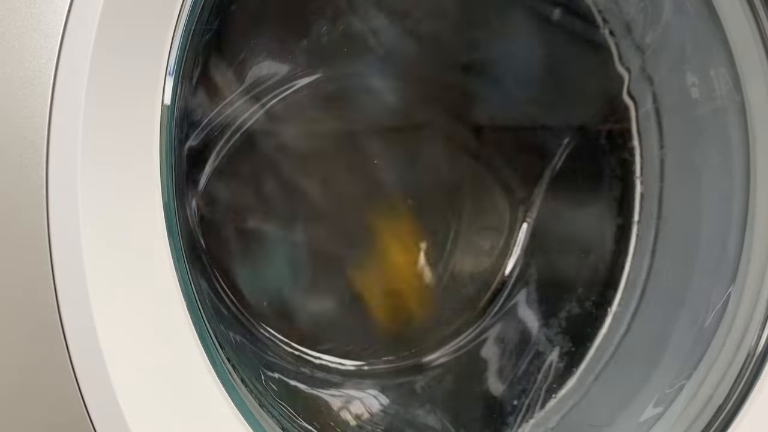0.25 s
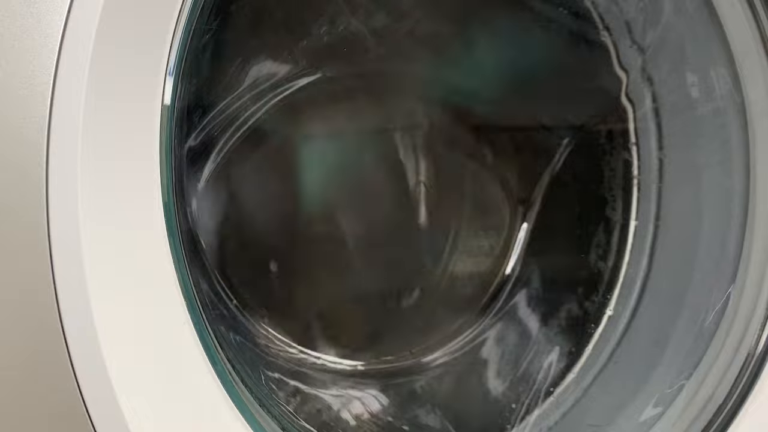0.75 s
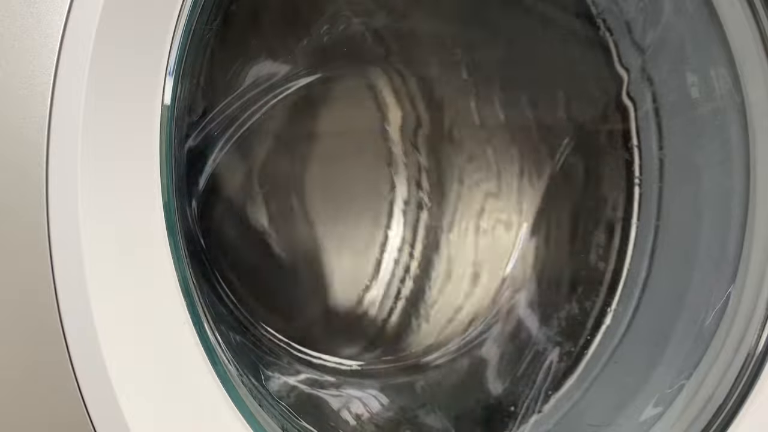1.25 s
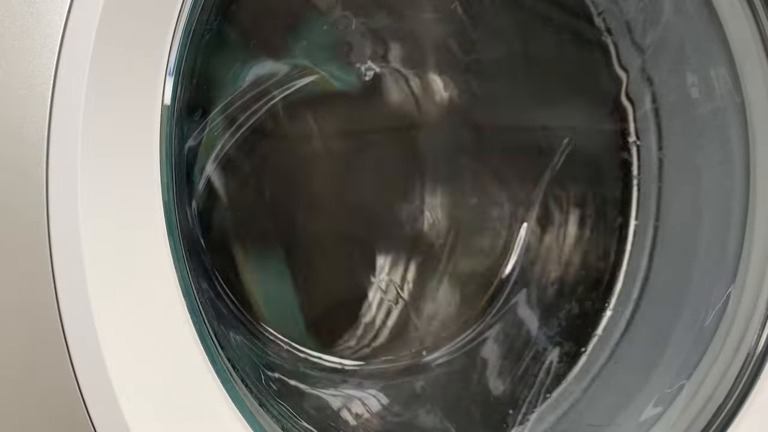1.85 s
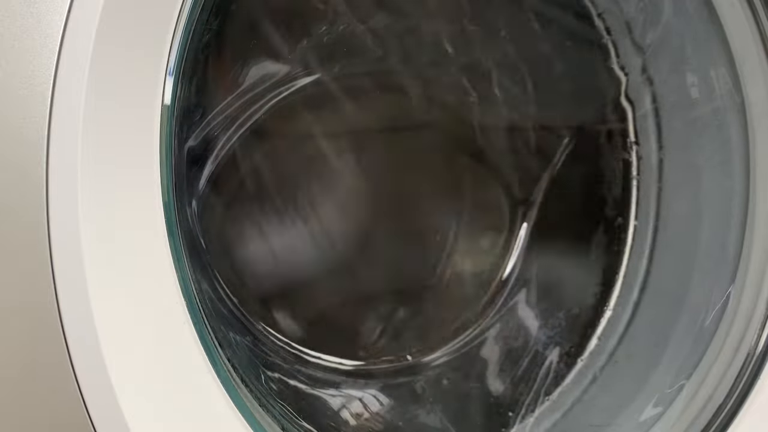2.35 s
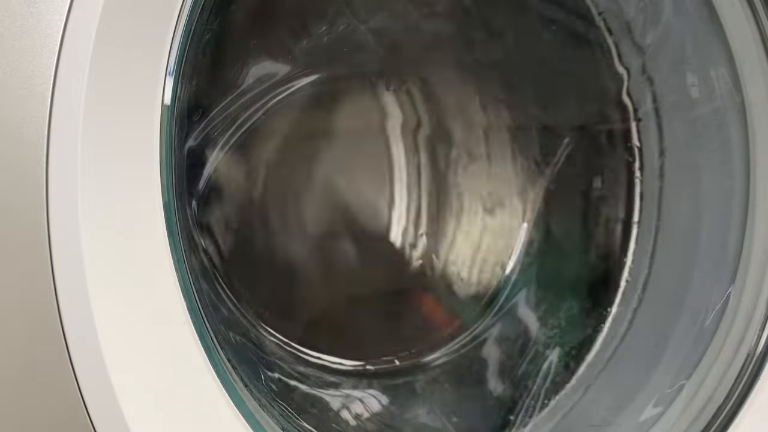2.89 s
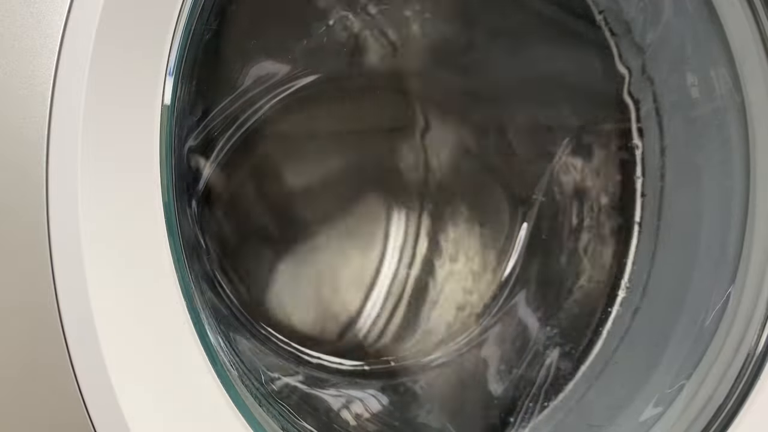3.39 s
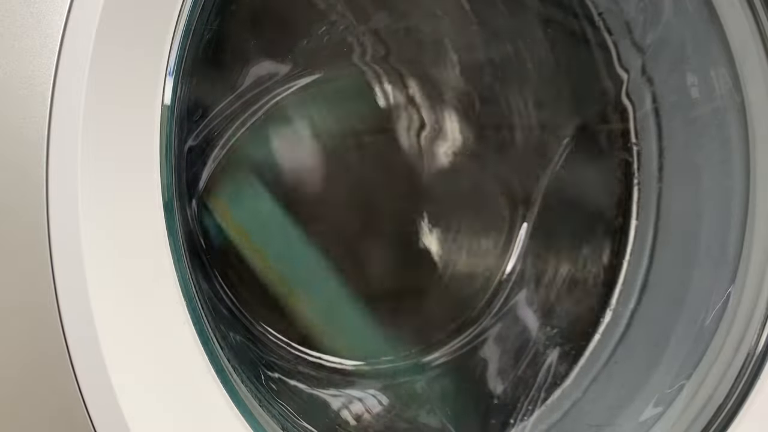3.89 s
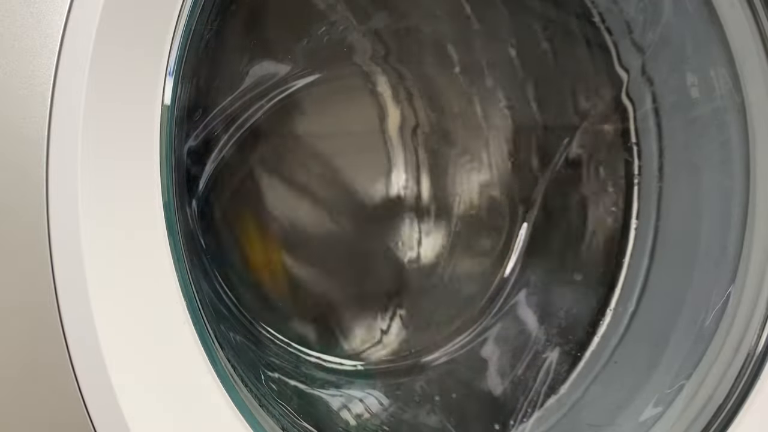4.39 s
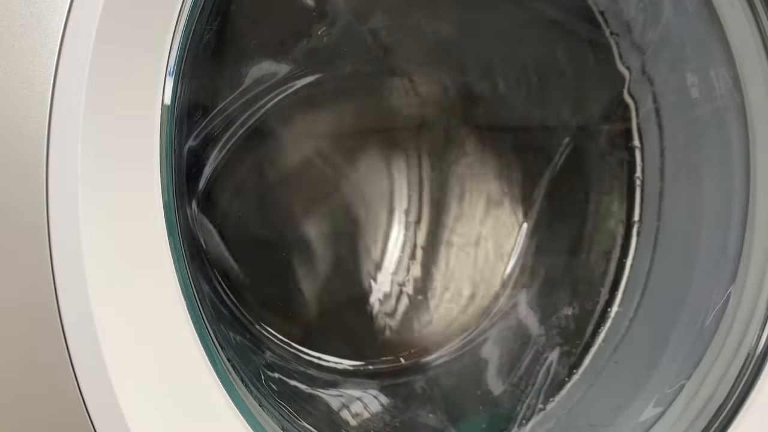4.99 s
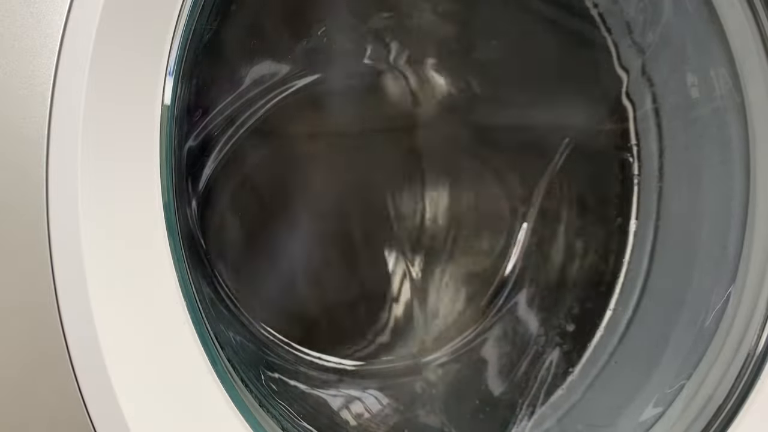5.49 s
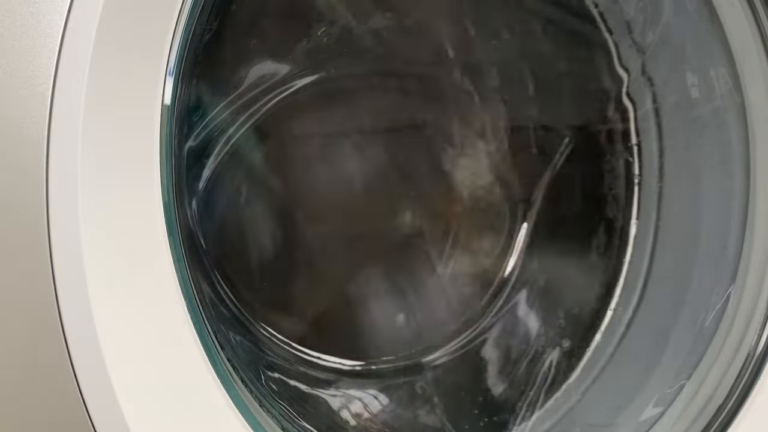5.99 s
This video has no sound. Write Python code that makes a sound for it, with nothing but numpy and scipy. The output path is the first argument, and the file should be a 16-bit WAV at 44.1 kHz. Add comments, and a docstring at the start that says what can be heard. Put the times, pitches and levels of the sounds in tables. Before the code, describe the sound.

For about six seconds a front-loading washing machine tumbles wet laundry, heard close to its door in a small room with a short, soft echo. A faint, wavering low motor hum and dull rumble run throughout. Water sloshes continuously, dark and full, with bubbling gurgles and thin fizzing spray, surging unevenly every 0.4 seconds. A hollow drum bump comes at 0.1, then small gulping slaps around 0.2 to 0.35. Splashy falls land at 1.4 and 1.5, a deep thud at 2.0 and softer knocks at 2.3 and 2.4. Wet smacks follow at 3.2, 3.9 and 4.05, with a plopping slap at 4.3. Falls crowd together from 4.7, peaking in the loudest splash and boom near 5.2, followed by a slap at 5.3. Another booming splash hits at 5.6, and a softer fall around 6.0 as the churning continues.

```python
"""In a small room, close to the door of a front-loading washing machine tumbling wet laundry.
Under it all the motor hums, a wavering sine, and the laundry rumbles as low noise heaved by three paddles.
Water is noise mixed with ringing bubbles, swelling with the paddle beat, small splats and breaking waves.
Folds slap shut with a gulp of trapped air. Falling clothes splash, smack and plop,
boom through the drum's modes and thud in the sprung tub."""
import sys
import numpy as np
from scipy import signal
from scipy.fft import rfft, irfft, next_fast_len
from scipy.io import wavfile
from scipy.ndimage import uniform_filter1d, map_coordinates

SR = 44100
rng = np.random.default_rng(int(sys.argv[2]) if len(sys.argv) > 2 else 0)


def wav_out(sig):
    """Save sig, one row per channel (or a flat mono array), as 16-bit PCM at SR to the path in sys.argv[1]."""
    wavfile.write(sys.argv[1], SR, np.round(np.clip(np.atleast_2d(sig).T, -1, 1) * 32767).astype(np.int16))


N = 275625

# Table levels are relative: each layer adds its own trim.
# motor hum: (f/Hz, level/dB)
MOTOR_HUM = (99.8, -46)
# spectrum of the tumbling laundry's rumble: (f/Hz, level/dB)
RUMBLE_SPECTRUM = [(20, -19), (36, -9), (52, -5.5), (80, 6), (100, -1.5), (130, -7), (300, -73)]
# spectrum of the deep, heaving water: (f/Hz, level/dB)
CHURN_SPECTRUM = [(70, -35), (125, -5.5), (165, 0), (230, 0), (330, -2), (450, -4.5), (1200, -50)]
# spectrum of the body of the water: (f/Hz, level/dB)
SLOSH_SPECTRUM = [(150, -19), (300, -6), (450, 1.5), (650, .3), (1000, -1.8), (1300, -4), (1650, -8),
                  (2100, -15), (3000, -25), (5000, -37), (10000, -70)]
# spectrum of the fizzing spray: (f/Hz, level/dB)
SPRAY_SPECTRUM = [(700, -4), (1700, 7.6), (2700, 2), (4000, -7.3), (5500, -10), (7500, -17.8),
                  (10800, -13.6), (12300, -19.5)]
# modes of the drum's air and shell: (f/Hz, level/dB, t60/s)
DRUM_MODES = [(162, -2.5, .18), (226, 1, .2), (281, -6, .2), (328, -4, .15), (405, -5.5, .12),
              (463, -6.5, .12), (615, -4, .09), (735, -7.3, .08), (962, -4.2, .08)]
# modes of the water-filled tub on its springs: (f/Hz, level/dB, t60/s)
TUB_MODES = [(62, -3, .22), (78, .5, .28), (98, -3, .5)]
# lift of the slosh by each of the three paddles in turn: (level/dB)
PADDLE_LIFTS = [5, 2.5, 4.5]
# waves that break over the laundry: (t/s of the start, slosh level/dB, spray level/dB, swell to the crest/s)
BREAKING_WAVES = [(0.0, -29.5, -46, 0.039), (0.348, -28, -49.5, 0.032), (0.488, -32.5, -46.5, 0.028),
                  (0.822, -25.5, -47, 0.024), (0.923, -32, -52.5, 0.018), (1.007, -29, -56, 0.02),
                  (1.085, -34.5, -63, 0.041), (1.21, -31.5, -55, 0.015), (1.618, -35, -44.5, 0.012),
                  (1.787, -41, -49.5, 0.02), (1.87, -33, -45.5, 0.026), (1.951, -27, -45.5, 0.045),
                  (2.267, -31.5, -46, 0.037), (2.358, -28, -47, 0.037), (2.669, -39, -47, 0.0081),
                  (2.815, -30.5, -62, 0.019), (2.988, -38, -55, 0.021), (3.228, -27, -47, 0.046),
                  (3.578, -32.5, -46.5, 0.016), (3.65, -28.5, -45, 0.022), (3.977, -31, -47, 0.023),
                  (4.219, -30, -46.5, 0.023), (4.262, -30, -48.5, 0.038), (4.432, -31.5, -49, 0.046),
                  (4.503, -31, -47, 0.022), (4.77, -30.5, -49.5, 0.058), (5.29, -31.5, -52, 0.028),
                  (5.626, -31.5, -62, 0.038), (5.714, -33, -55, 0.039), (5.85, -26.5, -46.5, 0.028),
                  (6.07, -30, -49, 0.033)]
# wet folds that slap shut on a pocket of air: (t/s, level/dB, pitch f/Hz)
FOLD_SLAPS = [(0.203, -28, 870), (0.283, -24, 700), (0.341, -27.5, 940), (1.02, -27, 580), (2.0, -29, 590),
              (2.703, -24, 940), (4.301, -22.5, 900), (4.44, -28, 1260), (4.864, -26, 740),
              (5.31, -21.5, 622), (5.65, -24.5, 670)]
# laundry falling into the water: (t/s, splash level/dB, boom level/dB, boom centre f/Hz,
# thud level/dB, thud centre f/Hz, spray level/dB, rise/s, splash t60/s)
LAUNDRY_FALLS = [(0.052, -29, -39, 250, -21, 76, -62, 0.003, 0.1),
                 (0.097, -23, -17, 410, -47, 100, -46, 0.0022, 0.35),
                 (0.812, -26.5, -36, 298, -36, 80, -44.5, 0.0055, 0.27),
                 (1.403, -17.5, -29, 290, -32, 97, -40, 0.003, 0.135),
                 (1.521, -14.5, -20.5, 225, -24, 100, -41.5, 0.003, 0.12),
                 (2.017, -27, -22.5, 226, -13, 75, -50, 0.0019, 0.13),
                 (2.29, -29, -19, 226, -21, 64, -41.5, 0.0083, 0.053),
                 (2.427, -23.5, -23.5, 240, -18, 82, -47, 0.0056, 0.48),
                 (3.187, -19, -26, 300, -19, 105, -45.5, 0.0027, 0.21),
                 (3.309, -25, -33, 233, -16, 88, -43, 0.0016, 0.11),
                 (3.876, -23.5, -29.5, 216, -19, 100, -43.5, 0.0058, 0.22),
                 (4.048, -16.5, -24, 260, -20, 92, -45, 0.0028, 0.17),
                 (4.686, -22.5, -22, 239, -42, 100, -45, 0.0054, 0.31),
                 (4.933, -23.5, -19.5, 300, -21, 84, -53, 0.0023, 0.24),
                 (5.033, -20, -20, 326, -36, 76.4, -46, 0.0022, 0.2),
                 (5.174, -13.5, -10.5, 355, -13.5, 104, -42.5, 0.0016, 0.14),
                 (5.196, -24, -14, 240, -13, 98, -52, 0.0016, 0.16),
                 (5.581, -17, -14, 278, -24, 105, -39, 0.0022, 0.25),
                 (6.025, -27.5, -20, 225, -22, 84, -49, 0.0027, 0.58)]
# decay of the room: (f/Hz, t60/s)
ROOM_DECAY = [(100, 0.69), (1000, 0.33), (10000, 0.13)]
# likeness of the two microphone ports: (f/Hz, likeness/0-1)
PORT_LIKENESS = [(100, .99), (260, .85), (450, .5), (1200, .35), (2500, .3), (5000, .55), (8000, .85)]
# phase by which the left port leads: (f/Hz, lead/rad)
LEFT_LEAD = [(100, -0.09), (280, 0.6), (600, 2.12), (1400, 2), (2900, 6.5), (5000, 8), (6800, 6.5),
             (10300, 0.5)]
# left port minus right port: (f/Hz, level/dB)
LEFT_TILT = [(100, 0.5), (190, 1), (350, 2.5), (620, 8.5), (1120, 2.5), (2010, 0), (4000, 7), (6500, 6.5),
             (9000, -1)]

TOP_HZ = 12300
PADDLE_EVERY_S, FIRST_PADDLE_S = .404, .175
# a paddle enters the water, drags it along, lets it run off
SCOOP_S, CARRY_S, DRAIN_S = .135, .17, .09
CALM_SLOSH_DB, CALM_SPRAY_DB = -39, -56  # between paddles, before the layer trims
WAVE_SHARPNESS = 1.2  # the sharper, the more a wave bunches round its crest
# small splats that lap all the time: mean rate, rise, decay, rms depth
LAPS_PER_S, LAP_RISE_S, LAP_T60_S, LAP_DB = 24, .004, .14, 1.1
SPRAY_FOLLOWS = .7  # share of the lapping's dB swing that the spray follows
LEVEL_SHIFT = .02  # share of their pitch by which the water's resonances lean either way
# a pocket sheds bubbles: delay and loss from one to the next, log-pitch scatter round the first
BREAKUP_S, BREAKUP_DB, BREAKUP_SPREAD = .0081, -6.5, .234
SLAP_RISE_S, SLAP_T60_S = .0035, .13
SLAP_SPLASH_DB, SLAP_SPRAY_DB = -5, -21  # against the gulp
PLOP_HZ, PLOP_SPREAD = 965, .04  # a steady ring struck by each fall: usual pitch, log-pitch scatter
# cloth sliding in ahead of its fall: time constant in rise times, level against the spray
SLIDE_RISES, SLIDE_DB = 3, -6.5


def amp(db):
    """Decibels to gain."""
    return 10 ** (np.asarray(db) / 20)


def unit(x):
    """Scale to rms 1."""
    return x / np.sqrt(np.mean(x ** 2) + 1e-20)


def along(points, hz):
    """Read a (f/Hz, value) curve on a log frequency axis."""
    f, v = np.transpose(points)
    return np.interp(np.log(hz + 1), np.log(f + 1), v)


def wobble(rate):
    """A smooth random curve, rate knots a second."""
    knots = rng.standard_normal(int(N * rate / SR) + 4)
    coarse = np.arange(0, N, 32)
    smooth = map_coordinates(knots, [coarse * rate / SR])
    return np.interp(np.arange(N), coarse, smooth)


def filtered(x, response):
    """Apply a complex response of frequency to x."""
    m = next_fast_len(N + SR // 4)
    hz = np.fft.rfftfreq(m, 1 / SR)
    return irfft(rfft(x, m) * response(hz), m)[..., :N]


def add(track, s, sound):
    """Mix a sound into a track at time s."""
    part = track[max(round(s * SR), 0):][:len(sound)]
    part += sound[:len(part)]


def burst(t, rise, t60):
    """A swell and decay with its top at 1."""
    shape = (1 - np.exp(-(t / rise) ** 2)) * amp(-60 * t / t60)
    return shape / shape.max()


def room(x):
    """A short tail of decaying noise: walls scatter the middle and treble, and the treble dies first."""
    hz, t, z = signal.stft(rng.standard_normal((2, SR // 3)), SR, nperseg=256)
    decay = amp(-60 * t / along(ROOM_DECAY, hz)[:, None])
    tail = signal.istft(z * decay, SR, nperseg=256)[1]
    no_bass = signal.butter(3, 500, "high", fs=SR, output="sos")
    tail = signal.sosfilt(no_bass, tail)
    return signal.fftconvolve(x, tail / np.linalg.norm(tail[0]), axes=1)[:, :N]


def paddles():
    """Lift of the water's level in dB: each paddle scoops, carries and drains, then the next follows."""
    passes, age = np.divmod(np.arange(N) / SR - FIRST_PADDLE_S, PADDLE_EVERY_S)
    draining = 1 - (age - SCOOP_S - CARRY_S) / DRAIN_S
    stroke = np.clip(np.minimum(age / SCOOP_S, draining), 0, 1)
    return np.take(PADDLE_LIFTS, passes.astype(int), mode="wrap") * stroke


def drum_peaks(hz, lift_db=9, width=.04):
    """Gain of the drum's resonances for the noise inside it; width is a share of each pitch."""
    return amp(sum((lift_db + db) / (1 + ((hz / f - 1) / width) ** 2) for f, db, _ in DRUM_MODES))


def coloured(x, spectrum):
    """Shape x to a spectrum at rms 1, its drum resonances leaning as the water rises and sinks."""
    def tuned(shift):
        return filtered(x, lambda hz: amp(along(spectrum, hz)) * drum_peaks(hz / (1 + shift)))

    low, high = tuned(-LEVEL_SHIFT), tuned(LEVEL_SHIFT)
    level = (1 + np.tanh(2 * wobble(7))) / 2
    return unit((2.5 - level) * low + level * high)


def motor():
    """A sine hum wavers a little with the load; each paddle heaves the laundry's noise rumble along."""
    hz, db = MOTOR_HUM
    waver_db = 2.2 * np.tanh(wobble(6))
    phase = 2 * np.pi * hz * np.arange(N) / SR + .5 * wobble(6)
    hum = np.sqrt(2) * amp(db + waver_db) * np.sin(phase)
    heave = amp(-41.5 + .5 * paddles())
    rumble = heave * coloured(rng.standard_normal((2, N)), RUMBLE_SPECTRUM)
    return hum, rumble


def bubbles(low_hz, high_hz, cycles, spread_db, count):
    """Two unrelated streams of bubbles, flat in spectrum: short ringing tones that rise in pitch."""
    when, pitch, size, stream = rng.random((count, 4)).T
    hz = low_hz * (high_hz / low_hz) ** pitch
    age = np.arange(int(cycles / low_hz * SR))
    turns = hz[:, None] * age / SR
    life = np.minimum(turns / cycles, 1)
    fade = np.exp(-np.log(100) * life) * (1 - life)
    tone = np.sin(2 * np.pi * turns * (1 + 0.14 * life)) * fade
    gain = hz * amp(-spread_db * np.log(size + 0.017))
    start = (when * N).astype(int) + N * (stream > .5)
    # both streams lie end to end in one track, then split
    pair = np.bincount((start[:, None] + age).ravel(), (gain[:, None] * tone).ravel(), 2 * N)
    return unit(pair[:2 * N].reshape(2, N))


def patchy(x, depth_db):
    """Pockets of air open and close between the clothes, each favouring its own band for a moment."""
    z = signal.stft(x, nperseg=512)[2]
    field = rng.standard_normal(z.shape[1:])
    field = uniform_filter1d(field, size=5, axis=0)  # across frequency
    field = uniform_filter1d(field, size=7, axis=1)  # across time
    return signal.istft(z * amp(depth_db * unit(field)), nperseg=512)[1][:, :N]


def laps(per_s, rise, t60):
    """Level curve of small random splats, each sudden and then running out; mean 0, rms 1."""
    hits = (rng.random(N) < per_s / SR) * rng.uniform(.5, 1, N)
    level = signal.fftconvolve(hits, burst(np.arange(SR // 4) / SR, rise, t60))[:N]
    return unit(level - level.mean())


def wash():
    """Slosh and spray levels in dB: the paddles' uneven beat, with waves that swell and run out on top."""
    stir_db = paddles() + 0.5 * wobble(28)
    slosh = amp(CALM_SLOSH_DB + stir_db) ** 2
    spray = amp(CALM_SPRAY_DB + stir_db) ** 2
    t = np.arange(SR // 2) / SR
    for s, slosh_db, spray_db, swell in BREAKING_WAVES:
        crest = (t / swell * np.exp(1 - t / swell)) ** WAVE_SHARPNESS
        add(slosh, s, (amp(slosh_db) * crest) ** 2)
        add(spray, s, (amp(spray_db) * crest) ** 2)
    return 10 * np.log10(slosh), 10 * np.log10(spray)


def splashes(splash_db, churn_db, spray_db):
    """Power of falls and slaps: cloth slides in, spray and splash burst, the deep churn follows."""
    t = np.arange(SR // 2) / SR
    splash, churn, spray = np.zeros((3, N))
    for s, db, boom_db, _, _, _, fizz_db, rise, t60 in LAUNDRY_FALLS:
        splash_gain, spray_gain = amp(db + splash_db), amp(fizz_db + spray_db)
        # a hard fall, with its short rise, comes with little warning
        slide = amp(SLIDE_DB) * np.exp(-t[::-1] / (SLIDE_RISES * rise))
        lead = slide[max(len(t) - round(s * SR), 0):]
        lead_start = s - len(lead) / SR
        add(spray, lead_start, (spray_gain * lead) ** 2)
        add(splash, lead_start, (splash_gain * lead / 2) ** 2)
        add(spray, s - .001, (spray_gain * burst(t, rise, 0.95 * t60)) ** 2)
        add(splash, s, (splash_gain * burst(t, rise, t60)) ** 2)
        add(churn, s + .005, (amp(boom_db + churn_db) * burst(t, 1.3 * rise, 1.6 * t60)) ** 2)
    for s, db, _ in FOLD_SLAPS:
        slap = amp(db) * burst(t, SLAP_RISE_S, SLAP_T60_S)
        add(splash, s, (amp(SLAP_SPLASH_DB) * slap) ** 2)
        add(spray, s, (amp(SLAP_SPRAY_DB) * slap) ** 2)
    return splash, churn, spray


def water():
    """Noise and bubbles in body, deep and mist layers, stirred all the time and thrown up by each fall."""
    slosh_db, spray_db = wash()
    splash, churn, spray = splashes(splash_db=-3.5, churn_db=-13, spray_db=6.0)
    lapping = LAP_DB * laps(LAPS_PER_S, LAP_RISE_S, LAP_T60_S)

    gurgle = rng.standard_normal((2, N))
    gurgle += 0.29 * bubbles(low_hz=277.7, high_hz=2518, cycles=21.3, spread_db=2.5, count=2600)
    fizz = rng.standard_normal((2, N))
    fizz += 0.34 * bubbles(low_hz=1710, high_hz=10900, cycles=4.2, spread_db=2.5, count=9000)

    # stirring and splashing add as powers
    body_gain = np.sqrt(amp(slosh_db + lapping - 0.2) ** 2 + splash)
    body = body_gain * coloured(patchy(gurgle, depth_db=1.32), SLOSH_SPECTRUM)
    # the deep water heaves with each surge
    deep_gain = np.sqrt(amp(slosh_db + 1.4 * wobble(18) - 3.0) ** 2 + churn)
    deep = deep_gain * coloured(rng.standard_normal((2, N)), CHURN_SPECTRUM)
    mist_gain = np.sqrt(amp(spray_db + SPRAY_FOLLOWS * lapping + 5.0) ** 2 + spray)
    mist = mist_gain * coloured(patchy(fizz, depth_db=2.0), SPRAY_SPECTRUM)
    return body + deep + mist


def pocket(hz, t, rise, t60):
    """Trapped air plops, its pitch climbing as it nears the surface, and sheds a few weaker bubbles."""
    out = np.zeros(len(t))
    for k, chance in enumerate(rng.standard_normal(size=4)):
        pitch = hz * np.exp(BREAKUP_SPREAD * min(k, 1) * chance)  # the first keeps its pitch
        tone = np.sin(2 * np.pi * pitch * t * (1 + 0.45 * t))
        add(out, k * BREAKUP_S, amp(k * BREAKUP_DB) * burst(t, rise, t60) * tone)
    return out


def gulps():
    """The pocket of air under each slapping fold rings out."""
    t, out = np.arange(SR // 3) / SR, np.zeros(N)
    for s, db, hz in FOLD_SLAPS:
        add(out, s, amp(db) * pocket(hz, t, SLAP_RISE_S, SLAP_T60_S))
    return out


def near(modes, centre_hz, db_per_octave):
    """The modes as a blow excites them: weaker the further they lie from its own pitch."""
    return [(hz, db - db_per_octave * abs(np.log2(hz / centre_hz)), t60) for hz, db, t60 in modes]


def ring(modes, t, rise, scatter_db):
    """Modes struck by a soft load, with new strengths, pitches and phases for each blow."""
    out = np.zeros(len(t))
    chances = rng.standard_normal((len(modes), 2))
    for (hz, db, t60), (strength, detune) in zip(modes, chances):
        tone = np.sin(2 * np.pi * hz * (1 + 0.023 * detune) * t + 2 * detune)
        out += amp(db + scatter_db * strength) * burst(t, rise, t60) * tone
    return out


def knocks():
    """Each fall smacks the drum, rings the modes near its pitch, strikes a steady plop near 960 Hz and shakes
    the tub."""
    t, out = np.arange(SR // 2) / SR, np.zeros(N)
    for s, db, boom_db, boom_hz, thud_db, thud_hz, _, rise, _ in LAUNDRY_FALLS:
        u = t / (0.36 * rise)  # the harder the contact, the shorter and taller its push
        smack = amp(db - 44.5) / rise * u * (2 - u) * np.exp(-u)
        add(out, s, smack)
        boom = ring(near(DRUM_MODES, boom_hz, 16), t, rise=2 * rise, scatter_db=1)
        add(out, s, amp(boom_db) * boom)
        plop_hz = PLOP_HZ * np.exp(PLOP_SPREAD * rng.standard_normal())
        add(out, s, amp(db + 2) * pocket(plop_hz, t, 2 * rise, t60=0.055))
        thud = ring(near(TUB_MODES, thud_hz, 28), t, rise=.013, scatter_db=1)
        add(out, s + .004, amp(thud_db - 5) * thud)
    return out


def ports(pair):
    """Two unrelated streams become left and right: the bass is shared, the left port is nearer."""
    def turn(hz):
        return np.arccos(np.clip(along(PORT_LIKENESS, hz), 0, 1)) / 2

    shared, apart = filtered(pair, lambda hz: np.array([np.cos(turn(hz)), np.sin(turn(hz))]))
    side = np.array([[1], [-1]]) / 2  # each port takes half the difference

    def offset(hz):
        return amp(side * along(LEFT_TILT, hz)) * np.exp(1j * side * along(LEFT_LEAD, hz))

    return filtered(np.array([shared + apart, shared - apart]), offset)


def scene():
    """Motor, water and knocks, with the room, at the two ports."""
    hum, rumble = motor()
    moving = water()
    moving[0] += knocks() + gulps()
    pair = moving + rumble + amp(-12) * room(moving)
    pair[0] += hum
    return ports(pair)


def record(dry):
    """The microphone drops the lowest bass; nothing is kept above the band limit."""
    no_bass = signal.butter(4, 46, "high", fs=SR, output="sos")
    thinned = signal.sosfilt(no_bass, dry)
    return filtered(thinned, lambda hz: hz < TOP_HZ)


dry = scene()
out = record(dry)
wav_out(out)
```